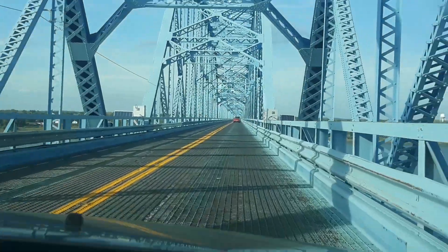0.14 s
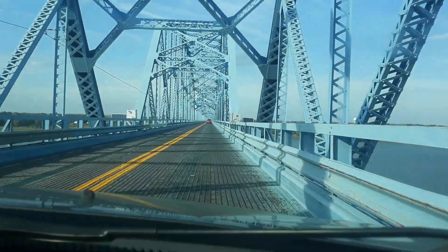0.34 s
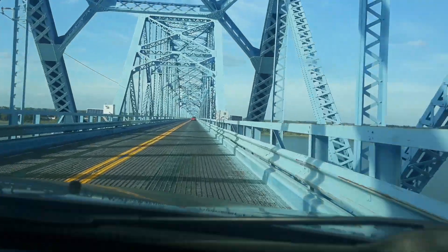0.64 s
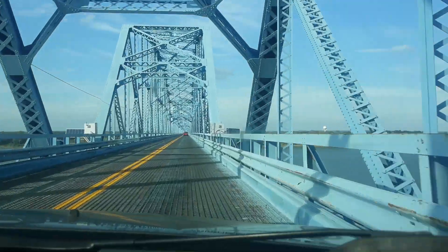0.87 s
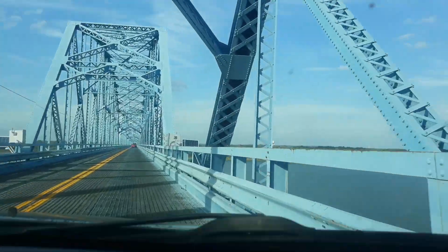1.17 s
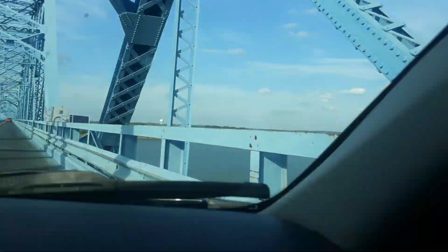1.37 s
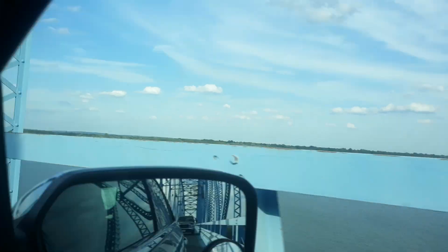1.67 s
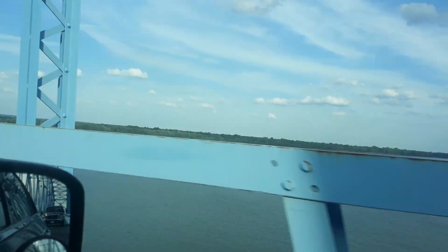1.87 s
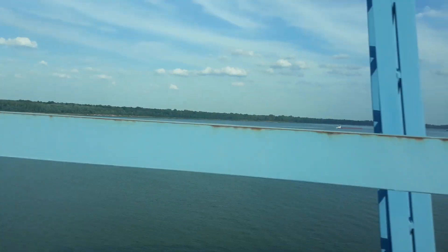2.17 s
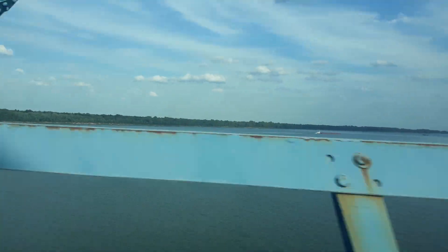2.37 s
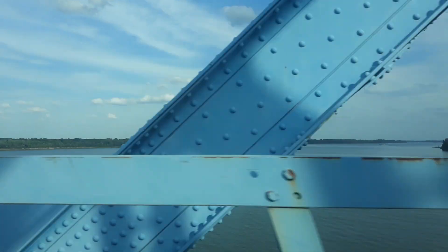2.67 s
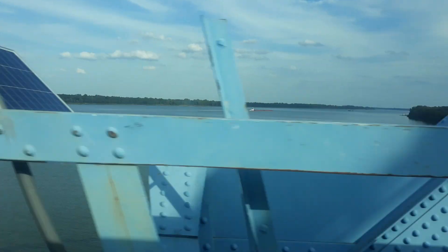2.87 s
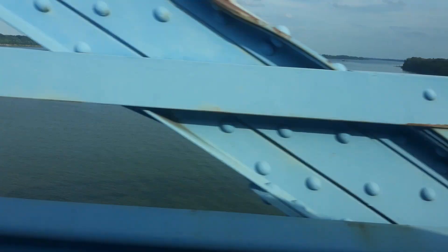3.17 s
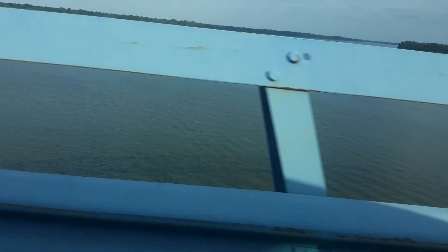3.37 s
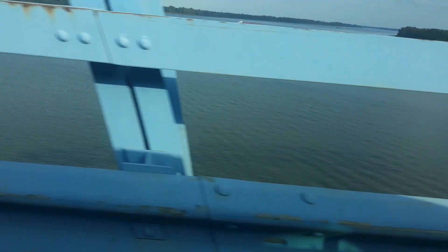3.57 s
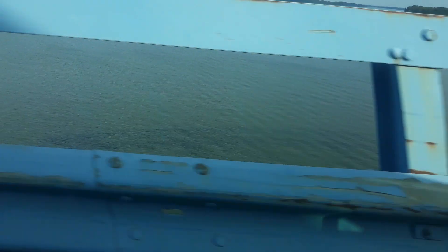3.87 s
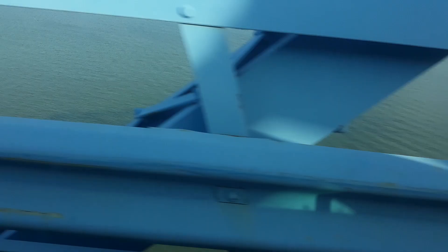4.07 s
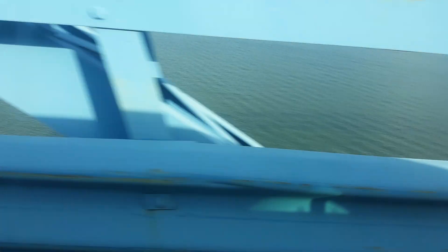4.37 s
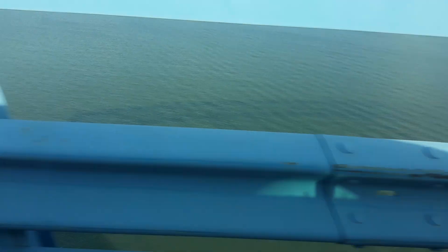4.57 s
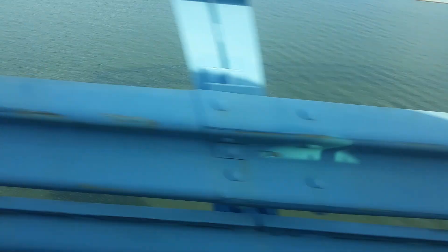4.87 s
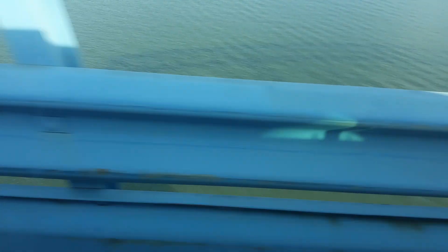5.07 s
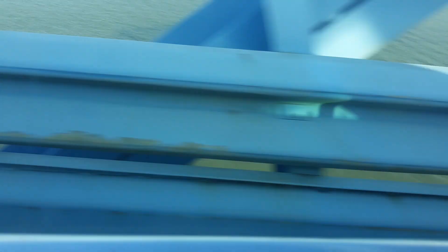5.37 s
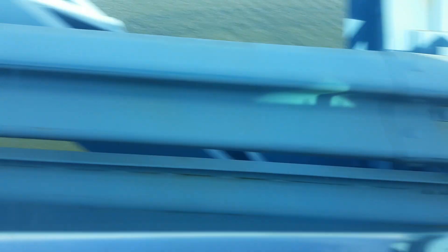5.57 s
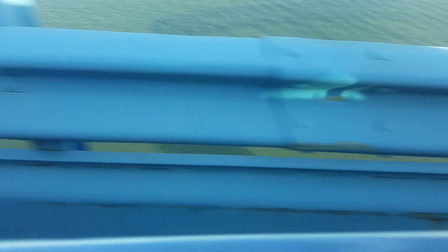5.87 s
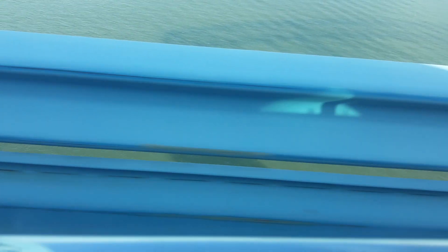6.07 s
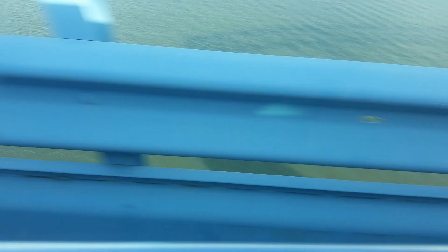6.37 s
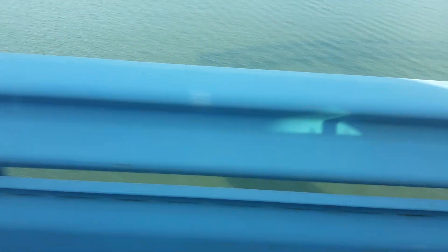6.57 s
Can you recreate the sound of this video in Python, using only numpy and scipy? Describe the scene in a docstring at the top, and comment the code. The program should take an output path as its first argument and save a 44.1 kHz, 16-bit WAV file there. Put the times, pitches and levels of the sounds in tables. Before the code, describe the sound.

A car crosses a bridge deck of open steel grating, heard from the passenger seat for nearly seven seconds. Throughout, the tyres sing a low hum with higher overtones, almost constant in pitch but wavering and swelling, over a deep cabin rumble and dull tread roar. Air hisses faintly along the side window. At about 0.3 seconds an oncoming car passes with a muffled roar that fades within a second. Soft bumps lift the rumble near 0.5, from 2.7 to 3.2, and around 4 seconds. Close to the microphone, a sleeve rustles quietly and a hand makes short light scuffs until about 3.3 seconds, clearest around 0.7. Plastic trim ticks at the start, most sharply at 0.7, then faintly near 4.2 and 5.9, with one small creak on the right at 3.5. The hum's upper tone grows stronger from 4.3 to 5.3, and the drone continues to the end.

```python
"""Inside a car on a bridge deck of open steel grating, from a camera microphone in the passenger seat.
The tyres strike the cross bars about 155 times a second and sing a wavering hum over the cabin's rumble.
A car passes in the other lane, air hisses along the side window, and the plastic trim ticks and creaks.
Right at the microphone, a hand and sleeve rub on the camera as it turns from the road to the window."""
import sys
import numpy as np
from scipy import signal
from scipy.fft import rfft, irfft, next_fast_len
from scipy.io import wavfile

SR = 44100
rng = np.random.default_rng(int(sys.argv[2]) if len(sys.argv) > 2 else 0)


def persist_wave(psi):
    """Save psi, clipped to +-1, as 16-bit WAV."""
    counts = np.round(np.clip(psi, -1, 1) * 32767).astype(np.int16)
    wavfile.write(sys.argv[1], SR, np.atleast_2d(counts).T)


N = 296793
TIME = np.arange(N) / SR


def from_db(db):
    """Decibels to gain."""
    return 10 ** (np.asarray(db) / 20)


def rms_one(x):
    """Scale to rms 1."""
    return x / np.sqrt(np.mean(x ** 2) + 1e-20)


def in_time(curve):
    """Read a curve of (time_s, value) at every sample."""
    return np.interp(TIME, *np.transpose(curve))


def at_hz(spectrum, hz):
    """Read a spectrum on a log-frequency axis."""
    freq_hz, level_db = np.transpose(spectrum)
    return np.interp(np.log(np.maximum(hz, 1)), np.log(freq_hz), level_db)


def swell(middle_s, half_s):
    """A bell-shaped rise and fall of height 1."""
    return np.exp(-((TIME - middle_s) / half_s) ** 2 / 2)


def drift(rate_hz):
    """Smooth random motion of rms 1, mostly below rate_hz."""
    hz = np.arange(N // 2 + 1) * SR / N
    rolloff = (1 + (hz / rate_hz) ** 2) ** 1.5
    return rms_one(irfft(rfft(rng.standard_normal(N)) / rolloff, N))


def left_right(mid, side):
    """Two channels from what they share and what differs."""
    return np.array([mid + side, mid - side])


def panned(x, pan_db):
    """Tip the sound to the left by so many dB; negative tips it right."""
    return x * from_db(np.array([[.5], [-.5]]) * pan_db)


# The microphone swings from the road ahead to the side window: time_s, share_of_turn
CAMERA_TURN = [(0, 0), (1.3, 0), (2.0, .6), (4.2, 1), (6.73, 1)]


def turning(ahead_db, side_db):
    """A left-right balance that moves with the camera."""
    return np.interp(in_time(CAMERA_TURN), [0, 1], [ahead_db, side_db])


# Stereo width at the seat: freq_hz, side_minus_mid_db
CABIN_WIDTH = [(60, -19), (160, -18), (300, -15), (420, -7.5), (630, -3.5), (900, 0), (1300, 3.5),
               (1520, 6.5), (1950, 0), (5000, 0), (14000, -.5)]


def cabin_noise(spectrum):
    """Coloured stereo noise, alike in the bass and diffuse in the treble; its mid has rms 1."""
    size = next_fast_len(N)
    hz = np.fft.rfftfreq(size, 1 / SR) + 1e-3
    low_hz, high_hz = spectrum[0][0], spectrum[-1][0]
    skirts = np.minimum(1, np.minimum(hz / low_hz, high_hz / hz)) ** 5
    mid, side = rfft(rng.standard_normal((2, size))) * from_db(at_hz(spectrum, hz)) * skirts
    mid = irfft(mid, size)[:N]
    side = irfft(side * from_db(at_hz(CABIN_WIDTH, hz)), size)[:N]
    return left_right(mid, side) / np.std(mid)


# Slipstream just outside the side window: time_s, level_db
AIR_LEVEL = [(0, -54.5), (1.0, -64), (2.0, -59.5), (3.0, -58), (4.2, -55), (5.6, -58), (6.1, -55.5),
             (6.73, -57)]
# Its colour through the glass: freq_hz, density_db
AIR_SPECTRUM = [(950, 7.5), (1800, 2.5), (2500, 0.5), (4200, -1), (4850, -11.5), (5800, -12.5),
                (6700, -9.5), (7150, -24.5), (8200, -30), (15500, -25)]


def window_air(gust_db=1, gust_hz=15, rush_db=-58.5):
    """The buffeting slipstream hisses; the pillar adds a lower rush while the microphone is near it."""
    hiss = from_db(in_time(AIR_LEVEL) + gust_db * drift(gust_hz)) * cabin_noise(AIR_SPECTRUM)
    near_pillar = swell(middle_s=2.14, half_s=.78)
    rush = from_db(rush_db) * near_pillar * cabin_noise([(1300, -2.5), (1850, -.5), (2300, -5)])
    return panned(hiss + rush, turning(ahead_db=3, side_db=-2))


# A sleeve beside the microphone: time_s, level_db
SLEEVE_LEVEL = [(0, -56.5), (.8, -59.5), (2.3, -62), (3.35, -63.5), (3.7, -70), (4.8, -73), (6.73, -77.5)]
# Colour of the cloth: freq_hz, density_db
SLEEVE_SPECTRUM = [(1500, -11.5), (2700, -15), (3500, -1.5), (4150, 1.5), (4700, -0.5), (5500, -2.5),
                   (6300, 2.5), (6900, -6.5), (7350, -15), (7850, -15.5), (8200, -25), (15500, -28)]


def sleeve_rustle(flicker_db=1.7, flicker_hz=25):
    """Cloth slides unevenly while the arm turns, then comes to rest."""
    level_db = in_time(SLEEVE_LEVEL) + flicker_db * drift(flicker_hz)
    return panned(from_db(level_db) * cabin_noise(SLEEVE_SPECTRUM), -.8)


# Skin sliding lightly on the casing, right at the microphone: time_s, level_db
GRIP_LEVEL = [(0, -74), (.8, -80.5), (1.3, -69.5), (1.7, -70), (2.3, -83.5), (3.1, -85.5), (3.4, -100),
              (6.73, -100)]
# Short rubs on the casing: middle_s, half_length_s, scuff_db, hiss_db
HAND_RUBS = [(.07, 0.025, -54, -84), (.602, 0.031, -52, -58), (.651, 0.014, -49, -46),
             (.696, 0.025, -47.5, -52.5), (.768, .012, -61, -63), (1.083, .03, -56.5, -82),
             (1.615, 0.027, -55, -64), (1.706, .018, -54, -84), (1.85, .022, -63, -74),
             (2.156, 0.047, -65, -75), (2.39, .008, -61, -70), (2.505, 0.016, -56, -60),
             (2.619, .014, -55.5, -65), (2.765, 0.021, -56.5, -74.5), (2.835, 0.031, -60, -67),
             (2.941, .0063, -55, -79), (3.13, .03, -59.5, -68), (6.031, .05, -66.5, -78.5)]
# Colour of the scuff: freq_hz, density_db
SCUFF_SPECTRUM = [(1200, -15), (1700, -5), (2350, -8), (2900, 3), (3200, -4), (3700, 0), (4200, 2.5),
                  (4650, -4.5), (6700, -2.5), (7250, -4), (7700, -15), (8600, -24), (15000, -35)]
# Bright hiss of skin: freq_hz, density_db
SKIN_SPECTRUM = [(5000, -24), (7000, -10), (8300, -15), (9800, -7.5), (11800, -2.5), (13000, -2.5),
                 (14500, 4), (15700, 2.5)]


def hand_on_camera(grain_db=.1, grain_hz=200):
    """Skin slides over the casing in tiny slips; each rub swells and fades."""
    scuff_gain, hiss_gain = np.zeros(N), from_db(in_time(GRIP_LEVEL))
    for middle_s, half_s, scuff_db, hiss_db in HAND_RUBS:
        rub = swell(middle_s, half_s)
        scuff_gain += from_db(scuff_db) * rub
        hiss_gain += from_db(hiss_db) * rub
    slips = rms_one(from_db(grain_db * drift(grain_hz)))
    scuff = panned(scuff_gain * cabin_noise(SCUFF_SPECTRUM), .8)
    hiss = panned(hiss_gain * cabin_noise(SKIN_SPECTRUM), 1.2)
    return slips * (scuff + hiss)


# Modes of the plastic trim: pitch_hz, level_db, t60_s
TRIM_MODES = [(1500, -4, .006), (2450, -5, .007), (3100, -4, .006), (3750, -6, .006), (4380, -4, .012),
              (5600, -7, .004), (6500, -8, .004)]


def plastic_ring(force, contact_hz=6500):
    """The trim answers a force with its few short modes; the soft contact takes off the top."""
    t = TIME[:SR // 10]
    ring = sum((-1) ** k * from_db(db - 60 * t / t60_s) * np.sin(2 * np.pi * hz * t)
               for k, (hz, db, t60_s) in enumerate(TRIM_MODES))
    soft_force = signal.sosfilt(signal.butter(6, contact_hz, fs=SR, output="sos"), force + 1e-18)
    return signal.fftconvolve(soft_force, ring[None], axes=1)[:, :force.shape[1]]


# Ticks in the trim around the seat: start_s, peak_db
TRIM_TICKS = [(.055, -37), (.095, -38), (.566, -37), (.657, -25), (4.224, -35.5), (4.457, -43), (5.92, -39)]


def trim_ticks(decay_s=.004):
    """A brief crack sets the plastic ringing, a little differently in each channel."""
    out, t = np.zeros((2, N)), TIME[:SR // 10]
    for start_s, peak_db in TRIM_TICKS:
        crack = rng.standard_normal((2, len(t))) * np.exp(-t / decay_s)
        tick = plastic_ring(crack)
        start = int(start_s * SR)
        out[:, start:start + len(t)] += from_db(peak_db) * tick / np.abs(tick).max()
    return out


# One creak from a panel right of the microphone: time_s, level_db
CREAK_LEVEL = [(3.45, -90), (3.459, -49), (3.47, -44), (3.484, -48), (3.494, -46), (3.505, -55),
               (3.56, -61), (3.66, -90)]


def trim_creak(slips_per_s=3000):
    """As the car body flexes, a short run of dense slips keeps the plastic ringing."""
    slips = (rng.random(N) < slips_per_s / SR) * rng.standard_normal((2, N))
    return panned(from_db(in_time(CREAK_LEVEL)) * rms_one(plastic_ring(slips)), -8)


# Coarseness of the deck under the tyres: time_s, level_db
DECK_LEVEL = [(0, -33), (.75, -33.5), (1.2, -35.5), (2.35, -33.5), (3.7, -35), (4.15, -31.5), (5.3, -34),
              (5.65, -36.5), (6.1, -34.5), (6.73, -35.5)]


def deck_drive_db(swing):
    """How hard the deck drives a layer of road noise; swing scales the changes about the mean."""
    deck_db = in_time(DECK_LEVEL)
    return deck_db.mean() + swing * (deck_db - deck_db.mean())


# Bumps in the deck: middle_s, rise_db
DECK_BUMPS = [(.47, 7), (.74, 2.5), (2.66, 5), (2.9, 6), (3.15, 3.5), (3.88, 6), (4.28, 4.5), (5.36, 1)]
# Cabin boom all round the microphone: freq_hz, density_db
BOOM_SPECTRUM = [(12, -40.5), (28, -27.5), (42, -7), (60, -10.5), (88, 4.5), (118, 7), (140, 2.5), (190, 1),
                 (300, -39)]
# Body panels, with the air ring inside the tyres near 225 Hz: freq_hz, density_db
PANEL_SPECTRUM = [(120, -26), (172, 1), (204, -17), (219, 4.5), (229, 4.5), (256, -6.5), (280, 0.5),
                  (335, -6), (370, -10.5), (440, -25.5), (560, -34.5)]


def cabin_rumble(boom_db=12, panel_db=6.5, dip_db=-6.5):
    """The deck shakes the suspension and panels, harder at each bump."""
    jolt_db = sum(rise_db * swell(middle_s, half_s=.021) for middle_s, rise_db in DECK_BUMPS)
    pillar_db = dip_db * swell(middle_s=1.6, half_s=.2)   # the camera swings past the windscreen pillar
    boom_gain = from_db(deck_drive_db(swing=1.1) + boom_db + jolt_db)
    panel_gain = from_db(deck_drive_db(swing=1.4) + panel_db + jolt_db + pillar_db)
    boom = panned(boom_gain * cabin_noise(BOOM_SPECTRUM), turning(ahead_db=-.8, side_db=.7))
    panels = panned(panel_gain * cabin_noise(PANEL_SPECTRUM), -.73)
    return boom + panels


def oncoming_car(nearest_s=.26, roar_db=-43, drone_db=-23.5):
    """A car one lane away roars by, muffled by the glass; its drone lingers in the panels."""
    def nearness(half_s):
        return 1 / (1 + ((TIME - nearest_s) / half_s) ** 2)
    muffled = cabin_noise([(600, .5), (850, 6), (1100, -10), (1500, -13), (2200, -25.5)])
    roar = from_db(roar_db) * nearness(half_s=.26) * muffled
    drone = from_db(drone_db) * nearness(half_s=.51) * cabin_noise(PANEL_SPECTRUM)
    return roar + drone


# Tread roar as it reaches the seat: freq_hz, density_db
TREAD_SPECTRUM = [(310, -1.5), (440, 1), (540, 0.5), (590, -0.5), (640, 1), (700, -7.5), (780, -9.5),
                  (835, -17), (1000, -18), (1250, -21), (1450, -40), (2000, -35), (3000, -52)]


def tread_roar(tread_db=.2, dip_db=-4):
    """The tread roars against the steel, dipping as the microphone swings past the windscreen pillar."""
    pillar_db = dip_db * swell(middle_s=1.447, half_s=.14)
    roar = from_db(deck_drive_db(swing=.8) + tread_db + pillar_db) * cabin_noise(TREAD_SPECTRUM)
    return panned(roar, turning(ahead_db=.3, side_db=.2))


# Grating bars struck per second, set by road speed: time_s, pitch_hz
BAR_RATE = [(0, 157), (1.0, 154.4), (2.2, 158), (3.3, 156), (4.2, 155.8), (5.0, 154.0), (5.8, 151.8),
            (6.73, 155)]


def bar_harmonic(number, steadiness, flutter_hz):
    """One harmonic of the bar rate: tyres on uneven bars drift in and out of step around a steady part."""
    def scatter():
        return drift(flutter_hz) + 1j * drift(flutter_hz)
    phase = 2 * np.pi * np.cumsum(in_time(BAR_RATE)) / SR
    carrier = np.exp(1j * number * phase)
    mid = np.real((np.sqrt(2) * steadiness + scatter()) * carrier) / np.sqrt(1 + steadiness ** 2)
    width = from_db(at_hz(CABIN_WIDTH, number * BAR_RATE[0][1]))
    side = width * rms_one(np.real(scatter() * carrier))
    return left_right(mid, side)


# Slow swells of the hum from under the floor, harmonics one to three: time_s, level_db
FUNDAMENTAL_LEVEL = [(0, -20), (.2, -19), (.38, -11.5), (.75, -26.5), (.88, -14.5), (1.19, -27.5),
                     (1.4, -18.5), (1.56, -23.5), (2.02, -12.5), (2.5, -18.5), (3.25, -21), (3.5, -14),
                     (3.88, -20), (4.08, -22), (4.58, -22), (4.92, -20), (5.1, -15), (5.27, -25.5),
                     (5.4, -15), (5.8, -29.5), (6.14, -17.5), (6.36, -23.5), (6.73, -20.5)]
OCTAVE_LEVEL = [(0, -24), (.15, -31), (.5, -21), (.72, -29), (.83, -20.5), (1.13, -33), (1.32, -25.5),
                (1.72, -32), (2.05, -21.5), (2.45, -22.5), (2.85, -25.5), (3.121, -35), (3.3, -26.5),
                (3.68, -27), (4.33, -15.5), (5.25, -19), (5.52, -33), (5.619, -22), (6.05, -24.5),
                (6.3, -21.5), (6.73, -21)]
THIRD_LEVEL = [(0, -43), (0.399, -41), (.8, -45.5), (1.5, -45), (2.35, -35.5), (4.501, -36), (5.65, -44.5),
               (6.1, -42), (6.73, -42.5)]
# Harmonics four to six: level_db, flutter_hz
UPPER_HARMONICS = [(-42.5, 33), (-56, 25), (-64, 18)]


def grating_hum(firming_db_per_db=.4):
    """The tyres sing at the bar rate; the two lowest harmonics grow steadier as they swell."""
    def firm_harmonic(number, curve, gain_db, steadiness, flutter_hz):
        level_db = in_time(curve)
        firmness = from_db(firming_db_per_db * (level_db - level_db.mean()))
        return from_db(level_db + gain_db) * bar_harmonic(number, steadiness * firmness, flutter_hz)
    fundamental = firm_harmonic(1, FUNDAMENTAL_LEVEL, gain_db=-.72, steadiness=2.4, flutter_hz=16)
    octave = firm_harmonic(2, OCTAVE_LEVEL, gain_db=-.9, steadiness=2.3, flutter_hz=15)
    third = from_db(in_time(THIRD_LEVEL)) * bar_harmonic(3, steadiness=.6, flutter_hz=14)
    upper = sum(from_db(level_db) * bar_harmonic(number, steadiness=.3, flutter_hz=flutter_hz)
                for number, (level_db, flutter_hz) in enumerate(UPPER_HARMONICS, start=4))
    return panned(fundamental, -.7) + panned(octave, -1.9) + panned(third + upper, 1.5)


def scene():
    """Everything that reaches the microphone in the passenger seat."""
    outside = grating_hum() + cabin_rumble() + tread_roar() + oncoming_car() + window_air()
    inside = sleeve_rustle() + hand_on_camera() + trim_ticks() + trim_creak()
    return outside + inside


def record(dry):
    """The camera cuts the top of the treble steeply."""
    cutoff_hz = 15750
    return signal.sosfilt(signal.ellip(10, .1, 90, cutoff_hz, fs=SR, output="sos"), dry)


dry = scene()
out = record(dry)
persist_wave(out)
```